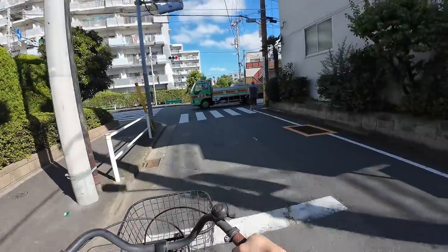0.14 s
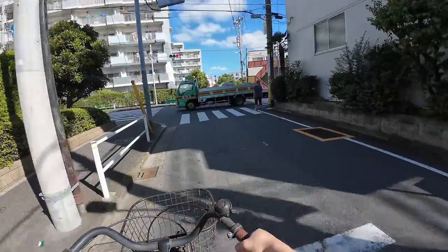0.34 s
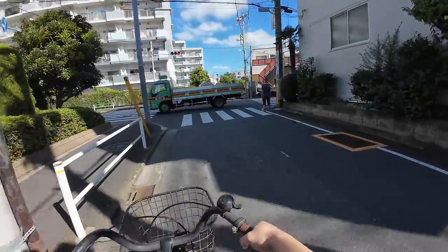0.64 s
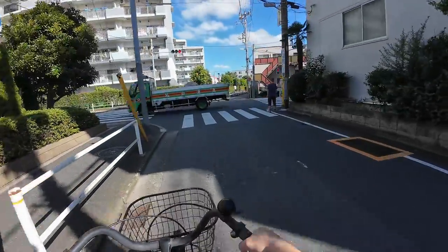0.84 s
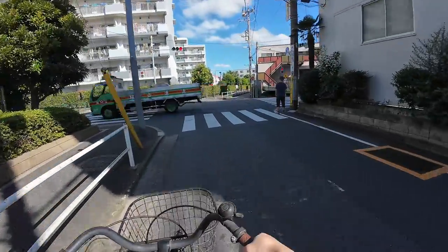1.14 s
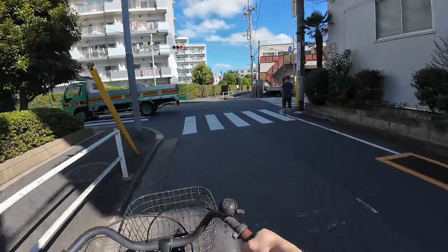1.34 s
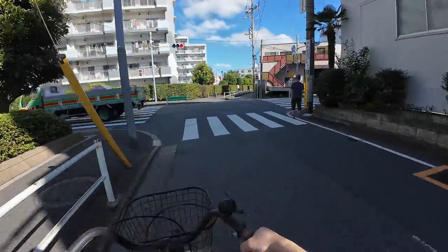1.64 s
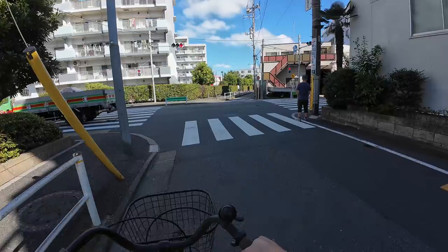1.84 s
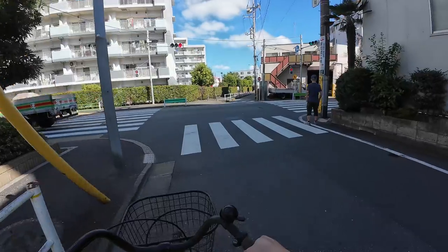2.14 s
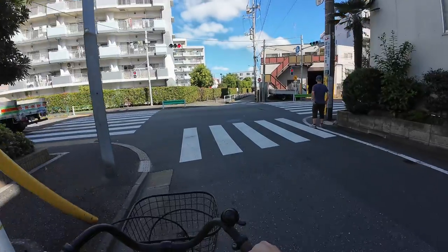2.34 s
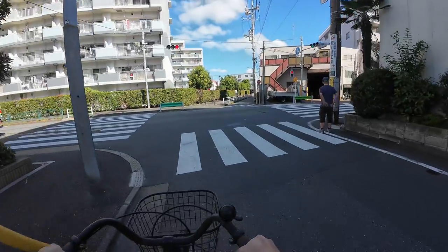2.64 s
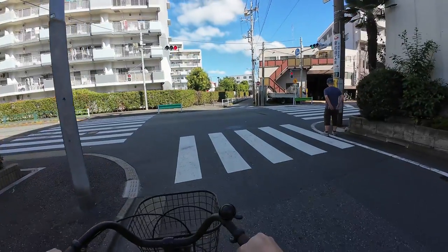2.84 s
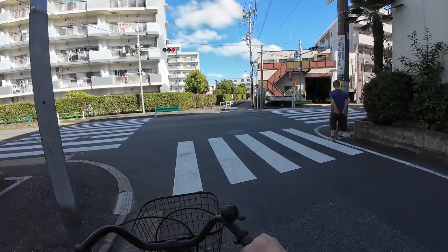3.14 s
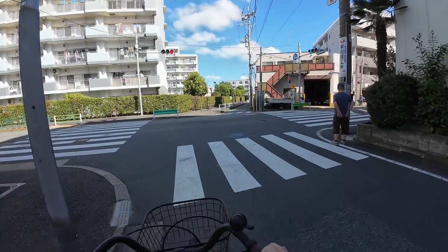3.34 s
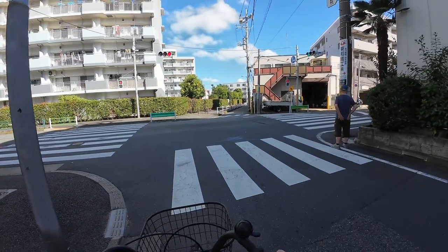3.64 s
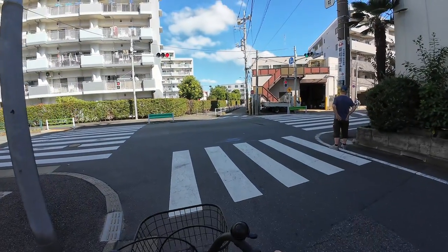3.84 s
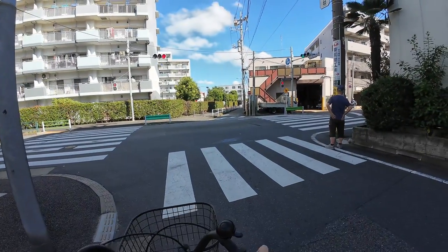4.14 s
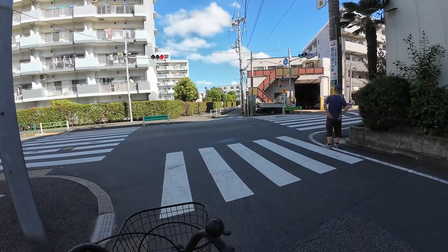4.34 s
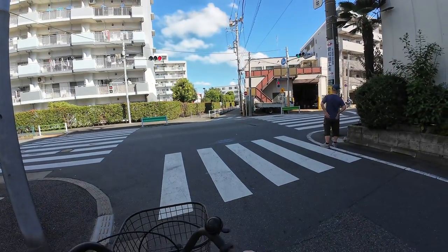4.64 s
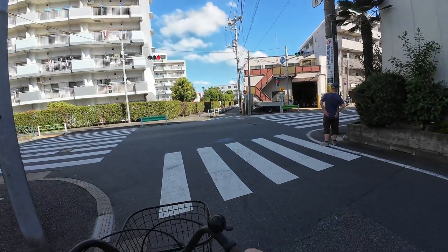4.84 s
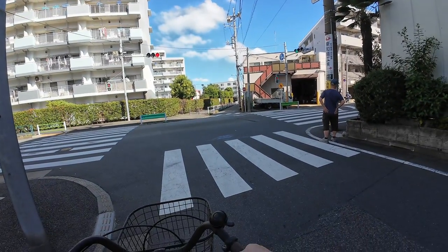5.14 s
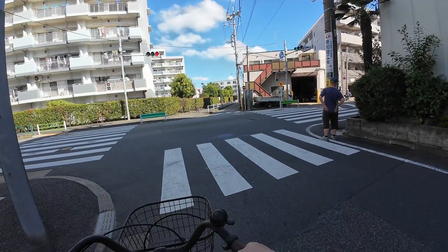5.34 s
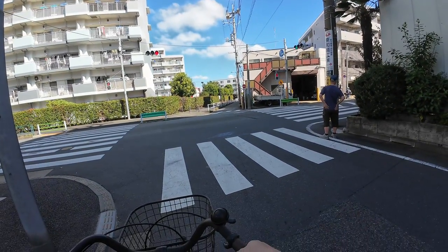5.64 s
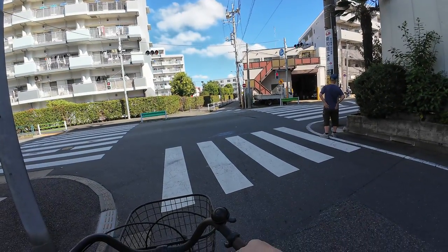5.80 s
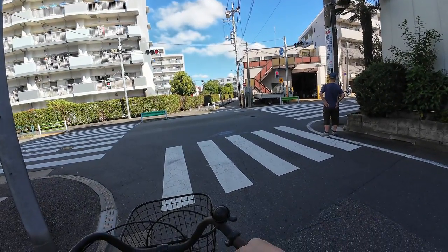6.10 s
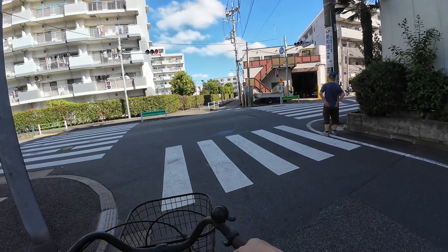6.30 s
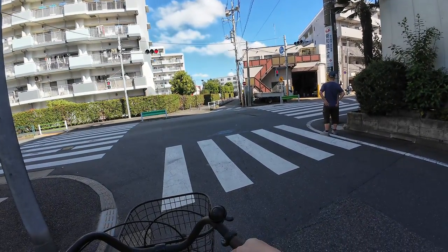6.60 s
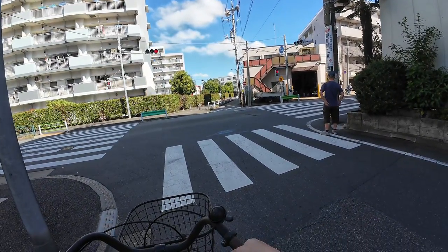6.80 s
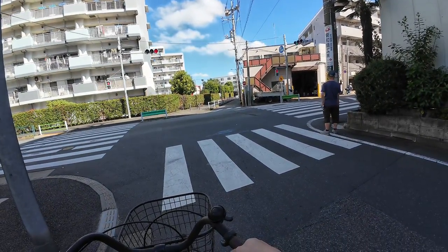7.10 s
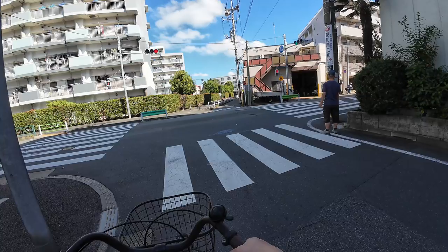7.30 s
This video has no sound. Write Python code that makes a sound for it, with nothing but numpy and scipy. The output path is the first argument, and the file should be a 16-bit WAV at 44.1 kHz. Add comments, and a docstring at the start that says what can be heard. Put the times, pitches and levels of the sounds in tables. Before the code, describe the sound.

Three sharp, very high brake squeals with a raspy chirping groan between them, over a departing truck's low rumble, then quieter street and another car nearing.

```python
"""A street corner between house walls: a bicycle slows to a stop, its brake the foremost sound at the microphone.
Wavering sines near 8 kHz make three strong squeals and a faint one; lower stacks of overtones make the groans.
A truck pulls away: its engine, a set of sines, speeds up until about 5 s; after that a low hum sinks in pitch.
Its roar of shaped noise fades and dulls. Another car comes near at the end. Sparse echoes return the brake
sounds from the walls; a thin treble fizz of band noise comes and goes."""
import sys
import numpy as np
from scipy import signal
from scipy.fft import rfft, irfft
from scipy.io import wavfile
from scipy.ndimage import uniform_filter1d

SR = 44100
rng = np.random.default_rng(int(sys.argv[2]) if len(sys.argv) > 2 else 0)


def transcribe(signal):
    """Save signal, clipped to [-1, 1], as a 16-bit WAV file at the path in sys.argv[1]."""
    frames = np.atleast_2d(signal).T
    limited = np.clip(frames, -1, 1)
    pcm = np.round(limited * 32767).astype(np.int16)
    wavfile.write(sys.argv[1], SR, pcm)


N = 328986

# the squealing brake, one list for each pull on the lever: start_s, pitch_hz, level_db
SQUEAL_PULLS = [
    [(1.064, 8060, -48), (1.073, 8000, -22), (1.08, 7950, -22), (1.085, 7940, -36), (1.096, 7930, -21),
     (1.101, 7930, -12), (1.107, 7940, -11), (1.113, 7960, -24), (1.119, 7960, -17), (1.127, 7950, -36),
     (1.134, 7930, -18), (1.142, 7930, -19), (1.148, 7960, -26), (1.153, 7980, -21), (1.165, 7860, -23),
     (1.168, 7790, -11), (1.21, 7760, -12.5), (1.226, 7640, -19), (1.232, 7630, -14), (1.262, 7640, -13.5),
     (1.272, 7660, -21), (1.286, 7640, -29), (1.294, 7720, -24), (1.308, 7720, -33), (1.318, 7720, -23),
     (1.328, 7730, -32), (1.336, 7740, -30), (1.36, 7780, -50)],
    [(1.912, 7955, -41), (1.922, 7840, -18), (1.942, 7790, -11), (1.964, 7830, -17), (1.976, 7822, -12),
     (2.06, 7815, -11), (2.134, 7774, -10), (2.15, 7710, -12), (2.162, 7650, -18), (2.19, 7640, -16),
     (2.198, 7650, -24), (2.21, 7690, -18), (2.224, 7756, -9.5), (2.26, 7775, -10), (2.268, 7715, -17),
     (2.298, 7703, -15), (2.324, 7714, -27), (2.334, 7724, -23), (2.365, 7770, -47)],
    [(2.44, 7940, -35), (2.446, 7640, -39), (2.46, 7560, -25.5), (2.49, 7670, -37.5)],
    [(3.025, 7980, -38), (3.031, 7930, -16), (3.052, 7873, -12), (3.07, 7870, -13), (3.08, 7876, -17),
     (3.098, 7885, -16.5), (3.116, 7900, -11.5), (3.144, 7907, -12.5), (3.16, 7940, -20),
     (3.171, 7945, -19), (3.181, 7950, -13.5), (3.201, 7995, -32), (3.215, 7970, -18), (3.224, 7980, -25),
     (3.231, 7990, -19.5), (3.243, 8020, -32), (3.255, 8030, -28), (3.262, 8050, -32), (3.276, 8000, -31),
     (3.304, 8000, -44), (3.325, 7850, -25), (3.36, 7780, -26), (3.378, 7761, -21.5), (3.428, 7752, -24),
     (3.448, 7690, -32), (3.462, 7615, -25), (3.54, 7580, -31), (3.58, 7585, -42), (3.66, 7570, -46),
     (3.775, 7640, -54), (3.8, 7640, -66)],
]
# octave level of each pull at the reference pitch, before twice the squeal's level is added: level_db
OCTAVE_LEVELS = [-21.5, -14.5, -17.5, -15.5]
REFERENCE_HZ, OCTAVE_DB_PER_HZ = 7770, 0.119  # the octave weakens as it nears the upper band limit
# every second slip differs and half-pitch lines sound:
# full_at_s, hold_s, level_db (re the squeal), rise_db_per_s, fall_db_per_s
HALF_PITCH = [(2.1, 0.3, -43, 200, 300), (2.16, .05, -36, 400, 400), (3.09, .09, -57, 604, 400)]
# two close modes beat and the squeal throbs evenly: deepest_dip_s, rate_hz, depth (0-1), reach_s
MODE_BEATS = [(1.193, 130, .35, .02), (1.24, 110, 0.1, .03), (2.055, 63, .35, 0.08),
              (2.176, 120, .55, 0.028), (2.278, 62, .3, .03), (3.39, 45, .25, 0.081), (3.5, 55, .25, .06)]


def squeal(rows, pull_db):
    """A brake mode locked in self-excited ringing: near a sine that trembles and throbs as the grip changes."""
    t, (hz, db) = columns(rows)
    db = uniform_filter1d(db, SR // 300, mode="nearest")  # the ringing cannot change at once
    octave_db = 2 * db + pull_db + OCTAVE_DB_PER_HZ * (REFERENCE_HZ - hz)
    turn = phase(hz * (1 + 0.0014 * wander(t, hz=70)))
    beat = np.zeros(len(t))
    for s, rate, depth, reach in MODE_BEATS:
        beat += depth * np.exp(-((t - s) / reach) ** 2) * np.cos(2 * np.pi * rate * (t - s))
    throb = (1 + 0.12 * wander(t, hz=70)) * (1 - beat)
    halves = np.sin(3 * turn / 2) + gain_of(6) * np.sin(turn / 2)
    halves *= 1 + .3 * wander(t, hz=30)
    lines = gain_of(db) * (np.sin(turn) + gain_of(swells(HALF_PITCH, t)) * halves)
    lines += gain_of(octave_db) * np.sin(2 * turn + .5 * wander(t, hz=200))
    return t[0], np.sqrt(2) * lines * throb * edges(t)


# groans of the pad slipping and gripping, one list each:
# start_s, pitch_hz, first_partial_db, second_partial_db, upper_db (reference for the upper partials and scrape)
PAD_GROANS = [
    [(2.522, 1775, -44, -50, -62), (2.531, 1750, -34, -25, -51), (2.539, 1720, -33, -21, -49),
     (2.545, 1685, -32, -28, -49), (2.551, 1680, -30, -20, -46), (2.56, 1685, -31, -24, -47),
     (2.567, 1688, -31, -22, -46), (2.58, 1680, -28, -35, -54), (2.586, 1715, -36, -27, -49),
     (2.592, 1695, -27, -20, -47), (2.6, 1650, -26, -20, -44), (2.604, 1625, -26, -26, -43),
     (2.609, 1600, -19, -20, -38), (2.613, 1615, -19, -19, -39), (2.617, 1690, -18, -14, -40),
     (2.622, 1625, -27, -24, -46), (2.634, 1598, -23, -30, -51), (2.648, 1610, -29, -35, -53),
     (2.658, 1600, -35, -34, -55), (2.668, 1620, -42, -46, -57), (2.695, 1670, -46, -50, -58),
     (2.716, 1720, -32, -39, -63), (2.73, 1680, -42, -47, -63), (2.745, 1640, -46, -56, -64)],
    [(3.408, 1520, -54, -50, -65), (3.414, 1500, -46, -38, -53), (3.424, 1520, -35, -36, -52),
     (3.433, 1550, -29, -47, -59), (3.441, 1540, -40, -54, -60), (3.45, 1525, -31, -54, -63),
     (3.485, 1510, -39, -60, -69), (3.502, 1515, -36, -62, -68), (3.56, 1490, -47, -66, -73)],
    [(3.81, 1705, -52, -70, -84), (3.86, 1711, -41, -65, -78), (3.915, 1716, -39, -63, -76),
     (3.95, 1720, -45, -67, -80)],
]
# upper partials of a groan: multiple (of the pitch), level_db (re upper_db)
UPPER_PARTIALS = [(3, 5.5), (4, 3), (5, 2), (6, 0.5), (7, -9), (8, -8.5), (9, -15)]
# relative spectrum of pad scraping, also that of the soft puffs and the rubbing: freq_hz, level_db
SCRAPE_SPECTRUM = [(1500, -21.5), (4000, 3.5), (6700, -3), (7500, 0), (8500, -15.5), (10000, -2),
                   (11500, -9), (13500, -5.5), (15800, -9)]


def groan(rows):
    """Stick-slip pulses: a rough stack of overtones, each trembling by itself, over bursts of scraping."""
    t, (hz, first_db, second_db, upper_db) = columns(rows)
    turn = phase(hz * (1 + .006 * wander(t, hz=250)))
    upper = np.zeros(len(t))
    for k, db in UPPER_PARTIALS:
        tremble = 1 + .45 * wander(t, hz=140)
        upper += gain_of(db) * tremble * np.sin(k * turn + .5 * wander(t, hz=350))
    scrape = evened(coloured(rng.standard_normal(len(t)), SCRAPE_SPECTRUM))
    upper += gain_of(-6 + 3 * wander(t, hz=60)) * scrape
    low = np.zeros(len(t))
    for k, db in (1, first_db), (2, second_db):
        tremble = 1 + .22 * wander(t, hz=150)
        low += gain_of(db) * tremble * np.sin(k * turn + .4 * wander(t, hz=300))
    return t[0], np.sqrt(2) * (low + gain_of(upper_db) * upper) * edges(t)


# brief fuzzy whistles beside the squeals and groans, some of them groan overtones or sum tones:
# start_s, length_s, pitch_hz, level_db, waver (share of the pitch)
SIDE_WHISTLES = [(2.159, .06, 4800, -51, .005), (2.17, .04, 5900, -57, .012), (2.17, .035, 7130, -49, .004),
                 (2.16, .06, 9450, -52, .015), (2.615, .035, 2100, -31, .02), (2.645, .045, 2150, -38, .02),
                 (2.6, .07, 13400, -49, .016), (2.67, .06, 13400, -57, .016), (2.62, .12, 6650, -55, .012),
                 (2.62, .07, 10000, -55, .012), (2.62, .03, 8400, -52, .01), (3.012, .018, 8200, -45, .005),
                 (3.043, .115, 7000, -51, .003), (2.16, .07, 13500, -58, .012),
                 (2.17, .05, 10200, -58, .03), (2.305, .085, 12500, -63, .004),
                 (3.085, .034, 8750, -58, .005), (3.035, .09, 15000, -60, .006),
                 (3.165, .04, 14300, -62, .015), (3.4, .05, 10550, -61, .012),
                 (3.45, .13, 10700, -67, .008), (3.49, .06, 12200, -67, .006), (3.5, .07, 13700, -66, .01),
                 (3.402, .016, 3450, -41, .025), (3.41, .19, 9200, -59, .008),
                 (3.768, .022, 4750, -48, .004), (3.767, .01, 6600, -50, .01), (3.825, .02, 6800, -58, .01),
                 (3.85, .05, 6000, -59, .015), (3.79, .06, 13300, -65, .015),
                 (3.895, .15, 13200, -62, .015), (6.087, .022, 7550, -70, .005)]


def whistle(s, length, hz, db, waver):
    """A brief whistle: a sine made fuzzy by fast random pitch and level."""
    t = np.arange(0, length, 1 / SR)
    turn = phase(hz * (1 + waver * wander(t, hz=200)))
    tremble = 1 + 0.31 * wander(t, hz=80)
    return s, np.sqrt(2) * gain_of(db) * tremble * np.sin(turn) * edges(t, .003, length / 3)


# soft puffs of bright noise around the brake sounds: start_s, level_db (before the soft start), t60_s
SOFT_PUFFS = [(1.835, -45, .35), (2.17, -43, .2), (2.41, -45, .2), (2.611, -38, .2), (2.809, -57, .044),
              (2.909, -56, 0.06), (3.245, -45, .2), (3.767, -34, 0.05), (3.899, -44, .08),
              (6.095, -61, .06)]


def soft_puffs():
    """Each puff is a short burst of bright noise with a soft start and an exponential decay."""
    out, t = np.zeros(N), np.arange(SR // 2) / SR
    bursts = coloured(rng.standard_normal((len(SOFT_PUFFS), len(t))), SCRAPE_SPECTRUM)
    for (s, db, t60), burst in zip(SOFT_PUFFS, bursts):
        decay = gain_of(db - 60 * t / max(t60, .01))
        add(out, s, decay * (1 - np.exp(-t / 0.003)) * evened(burst))
    return out


# dry rubbing of the pad: full_at_s, hold_s, level_db, rise_db_per_s, fall_db_per_s
PAD_RUB = [(2.625, 0.044, -42, 800, 198.3), (3.77, 0.0027, -44, 2020, 359.6),
           (3.892, 0.0053, -47, 91, 75.03)]


def rub():
    """Dry friction of the pad: scraping noise without a tone."""
    t = np.arange(N) / SR
    return gain_of(swells(PAD_RUB, t)) * evened(coloured(rng.standard_normal(N), SCRAPE_SPECTRUM))


# house walls: freq_hz, t60_s
WALL_DECAY = [(1000, 0.68), (4000, 0.28), (8000, 0.92), (15000, 1)]
# the echoes favour the higher notes of the squeal: freq_hz, level_db
ECHO_COLOUR = [(7550, -5.5), (8000, 8.5), (9000, 1)]


def walls(x):
    """Sparse echoes of random sign from the house walls, each band dying at its own speed."""
    taps = np.zeros(SR)
    at = np.arange(400, SR - 20, 20)
    taps[at + rng.integers(0, 20, len(at))] = rng.choice([-1., 1.], len(at))
    hz, t, z = signal.stft(taps, SR, nperseg=256)
    decay = gain_of(-60 * t / read(WALL_DECAY, hz)[:, None])
    tail = signal.istft(z * decay, SR, nperseg=256)[1]
    return signal.fftconvolve(coloured(x, ECHO_COLOUR), tail / np.linalg.norm(tail))[:N]


# truck engine, and after about 5 s a low hum that sinks in pitch: start_s, firing_hz (before smoothing),
# first_order_db, second_order_db, third_order_db, fifth_order_db, high_db (reference for the sixth order and up)
TRUCK_ENGINE = [(0.0, 38.85, -33, -39, -44, -37, -42), (0.32, 39.38, -30, -48, -34, -41, -33),
                (0.51, 40.55, -42, -35, -42.5, -34, -35.5), (0.91, 42.64, -25.5, -54, -35.5, -42, -39.5),
                (1.49, 44.05, -26, -46, -33, -28.5, -40), (1.68, 44.35, -26, -32, -33.5, -41, -39.5),
                (2.1, 45.23, -30, -45, -37.5, -46, -33.5), (2.16, 45.12, -32, -48, -39.5, -50, -50.5),
                (2.49, 45.7, -33, -36.5, -41, -36.5, -32.5), (2.79, 46.65, -33.5, -54, -33, -57, -37),
                (3.18, 47.59, -30, -42, -37, -46, -47.5), (3.26, 47.5, -28, -44, -51, -40, -35),
                (3.45, 47.7, -32, -42, -38, -52.5, -40), (4.61, 48.75, -43.5, -48, -48, -47, -38),
                (5.09, 48.84, -37.5, -51, -43, -47.5, -51), (5.21, 49.95, -35.5, -52, -46, -48.5, -40.5),
                (5.56, 46.24, -34, -46.5, -59, -56, -40), (5.74, 41.13, -45, -44.5, -46, -48.5, -45),
                (5.82, 40.77, -31, -47, -48, -44, -46.5), (6.05, 32.1, -35, -48, -59.5, -50.5, -49),
                (6.14, 30.8, -37, -48, -43.5, -55, -50), (6.3, 28.5, -54, -53, -50, -45, -59)]
# third and fourth orders: multiple (of the firing rate), level_db (re third_order_db)
MIDDLE_ORDERS = [(3, 0), (4, -6.5)]
# sixth order and up: multiple (of the firing rate), level_db (re high_db)
UPPER_ORDERS = [(6, -1), (7, -20), (8, -10.5)]


def truck_engine():
    """Cylinders firing in turn: sines at multiples of the firing rate, the upper ones slightly wavering."""
    out = np.zeros(N)
    t, (_, first_db, second_db, third_db, fifth_db, high_db) = columns(TRUCK_ENGINE)
    turn = firing()[:len(t)]
    orders = gain_of(first_db) * np.sin(turn)
    groups = [([(2, 0)], second_db), (MIDDLE_ORDERS, third_db), ([(5, 0)], fifth_db), (UPPER_ORDERS, high_db)]
    for table, level_db in groups:
        for k, db in table:
            tremble = 1 + .15 * wander(t, hz=5)
            orders += gain_of(level_db + db) * tremble * np.sin(k * turn + .25 * wander(t, hz=3))
    add(out, t[0], np.sqrt(2) * orders * edges(t, 0.00073, 0.077))
    return out


def firing():
    """Phase of the truck's firing cycle; the flywheel smooths the speed."""
    s, hz = np.transpose(TRUCK_ENGINE)[:2]
    rate = np.interp(np.arange(N) / SR, s, hz)
    return phase(uniform_filter1d(rate, SR // 3, mode="nearest"))


# hum of the car that comes near: start_s, pitch_hz, level_db
CAR_HUM = [(6.75, 56, -44), (6.92, 64.2, -46), (7.46, 65, -46.5)]
# faint whine of that car: start_s, pitch_hz, level_db
CAR_WHINE = [(6.95, 5700, -89), (7.2, 5670, -68.5), (7.46, 5660, -68)]


def coming_car():
    """The car's low hum and high whine: one sine each, roughened by fast pitch waver."""
    out = np.zeros(N)
    for rows, waver in (CAR_HUM, .01), (CAR_WHINE, .035):
        t, (hz, db) = columns(rows)
        turn = phase(hz * (1 + waver * wander(t, hz=201)))
        add(out, t[0], np.sqrt(2) * gain_of(db) * np.sin(turn) * edges(t, 0.039, 1e-3))
    return out


# drone of the truck body while it is close: full_at_s, hold_s, level_db, rise_db_per_s, fall_db_per_s
BODY_SWELL = [(.45, 0.6, -30, 6, 5)]
# resonances of the truck body: freq_hz, width_hz, level_db (relative)
BODY_RESONANCES = [(367.4, 127, 0.5), (1310, 260, -11.5), (2640, 290, -14.5), (3580, 200, -19.5)]
BODY_GONE_S = 3  # the truck turns behind the hedge


def truck_body(t, hz, patches):
    """The body droning in a few resonant bands of noise; the drone falls faster once behind the hedge."""
    bands = [db - 11.0 * ((hz - f) / width) ** 2 for f, width, db in BODY_RESONANCES]
    level_db = swells(BODY_SWELL, t) - 20.0 * np.maximum(t - BODY_GONE_S, 0)
    return noise(np.max(bands, axis=0) + patches, t, level_db)


# passing traffic: start_s, rumble_db, tyre_roar_db
TRAFFIC_LEVELS = [(0, -30, -33.5), (.95, -29.5, -31), (1.43, -27, -31.5), (2.199, -32, -35),
                  (2.78, -32.5, -35.5), (3.6, -33, -37), (4.3, -32.5, -39), (5.28, -34.5, -41.5),
                  (6, -38.5, -49), (6.71, -40, -52), (7.02, -35.5, -46), (7.46, -36, -42.5)]
# relative spectrum of the tyre roar: freq_hz, level_db (per Hz)
ROAR_SPECTRUM = [(240, -26.5), (400, -4), (773, -6.5), (1320, -1), (1640, -7), (2720, -10), (3030, -21),
                 (3640, -18.5), (5850, -28), (7140, -34.5), (8200, -34.5), (11300, -41.5), (13400, -32),
                 (15600, -47.5)]
# tilt per octave above 1 kHz, falling as the truck leaves
DULL_START_DB, DULL_DB_PER_S = 4, -1.0852


def tyre_roar(t, hz, patches):
    """Tyres on the road: broad noise that loses treble with distance."""
    dull_db = DULL_START_DB + DULL_DB_PER_S * t
    tilt = dull_db * np.log2(np.maximum(hz / 1000, 1))
    return noise(read(ROAR_SPECTRUM, hz) + tilt + 0.84 * patches, t, traffic_levels(t)[1])


# relative spectrum of the far tyre hiss: freq_hz, level_db (per Hz)
STREET_SPECTRUM = [(1800, -24), (2800, 1), (3300, 1.5), (3900, -4), (4600, -15.5), (5800, -15),
                   (7100, -26.5), (9700, -24), (11900, -26), (13400, -25), (15700, -28)]
STREET_DB, STREET_FOLLOW = -18.5, 0.86  # far tyre hiss follows the roar by this share of its dB
ROLL_DB, ROLL_S = 5.5, 1.3  # extra hiss while the bicycle rolls fast, and the time in which it dies away


def street_hiss(t, hz, patches):
    """Far tyres and the rolling bicycle: hiss tied to the roar, with extra level at the start."""
    rolling_db = ROLL_DB * np.exp(-(t / ROLL_S) ** 2)
    level_db = STREET_DB + STREET_FOLLOW * traffic_levels(t)[1] + rolling_db
    return noise(read(STREET_SPECTRUM, hz) + patches, t, level_db)


# relative spectrum of the rumble, before its tilt: freq_hz, level_db (per Hz)
RUMBLE_SPECTRUM = [(12, -26.5), (20, 12), (54, -5), (156, -1), (201, 0), (300, -1), (357, -8.5),
                   (567, -8.5), (900, -17), (1170, -61.5), (1980, -120)]
# rumble brightness: start_s, tilt_db (per octave)
RUMBLE_TILT = [(0, 0.6), (1.4, .5), (2.8, 1), (5.3, 1), (6.8, -1), (7.46, -1.5)]


def rumble(t, hz, patches):
    """Low traffic noise whose spectrum tilts slowly about 200 Hz."""
    tilt = np.interp(t, *np.transpose(RUMBLE_TILT)) * np.log2(np.maximum(hz, 30) / 200)
    return noise(read(RUMBLE_SPECTRUM, hz) + tilt + 0.75 * patches, t, traffic_levels(t)[0])


# high fizz that comes and goes: full_at_s, hold_s, level_db, rise_db_per_s, fall_db_per_s
FIZZ_SWELLS = [(4.12, .36, -66.5, 62, 150), (4.87, .35, -62, 259, 43), (6.15, .33, -65, 250.5, 120),
               (6.55, .23, -70, 201, 350.5), (7.32, .06, -68, 349.5, 100), (7.46, .02, -57.5, 109, 101)]
# one short hiss near 9.5 kHz: full_at_s, hold_s, level_db, rise_db_per_s, fall_db_per_s
SHORT_HISS = [(4.234, 0.011, -55.5, 220.3, 170.5)]


def fizz(t, hz, patches):
    """Thin treble noise in two narrow bands: fizz near 13.8 kHz and one short hiss near 9.5 kHz."""
    high = noise(-6.5 * ((hz - 13800) / 1100) ** 2 + 1.5 * patches, t, swells(FIZZ_SWELLS, t))
    low = noise(-6.5 * ((hz - 9500) / 700) ** 2 + 1.64 * patches, t, swells(SHORT_HISS, t))
    return high + low


CLATTER = .12  # mean depth by which each firing pulses the body drone, roar and hiss


def traffic():
    """All road noise in shared drifting patches; the truck's firing pulses its body, the roar and the hiss."""
    t, hz = np.arange(N // 256 + 5) * 256 / SR, np.fft.rfftfreq(1024, 1 / SR)[:, None]
    grain = rng.standard_normal((len(t), len(hz))).T
    patches = evened(uniform_filter1d(uniform_filter1d(grain, 10, 0), 14, 1))
    field = t, hz, patches
    pulsing = np.arange(N) < TRUCK_ENGINE[-1][0] * SR
    pulse = 1 + CLATTER * (1 + 0.33 * wander(pulsing, hz=9.8)) * np.cos(firing()) * pulsing
    pulsed = (truck_body(*field) + tyre_roar(*field) + street_hiss(*field)) * evened(pulse)
    return rumble(*field) + pulsed + fizz(*field)


def traffic_levels(t):
    """Rumble and tyre roar levels in dB at the times t."""
    s, *curves = np.transpose(TRAFFIC_LEVELS)
    return [np.interp(t, s, c) for c in curves]


def gain_of(db):
    """Decibels to a factor."""
    return 10 ** (np.asarray(db) / 20)


def evened(x):
    """Scales to rms 1."""
    return x / np.sqrt(np.mean(x ** 2) + 1e-20)


def phase(hz):
    """Running phase in radians of a pitch given at every sample."""
    return 2 * np.pi * np.cumsum(hz) / SR


def read(points, hz):
    """Reads a spectrum table on a log-frequency axis."""
    f, value = np.transpose(points)
    return np.interp(np.log(hz + 1), np.log(f + 1), value)


def coloured(x, points):
    """Filters x by a spectrum table."""
    size = x.shape[-1]
    return irfft(rfft(x) * gain_of(read(points, np.fft.rfftfreq(size, 1 / SR))), size)


def columns(rows):
    """Time axis over a table's span and its columns at every sample."""
    s, *rest = np.transpose(rows)
    t = np.arange(s[0], s[-1], 1 / SR)
    return t, [np.interp(t, s, c) for c in rest]


def swells(rows, t):
    """Level in dB of the loudest swell at each time: rise, hold, fall."""
    return np.max([db - rise * np.maximum(s - t, 0) - fall * np.maximum(t - s - hold, 0)
                   for s, hold, db, rise, fall in rows], axis=0)


def wander(t, hz):
    """Smooth random motion of rms 1, up to about hz turns a second."""
    size = max(int(SR / hz / 2), 2)
    return evened(uniform_filter1d(uniform_filter1d(rng.standard_normal(len(t)), size), size))


def noise(field_db, t, level_db):
    """Noise with short-time spectra shaped by field_db (bins x frames), evened, then set to level_db over time."""
    shape = gain_of(field_db) * np.ones(len(t))
    a, b = rng.standard_normal((len(t), len(shape), 2)).T
    z = (a + 1j * b) * shape / np.sqrt((shape ** 2).mean(0))
    x = evened(signal.istft(z, nperseg=1024, noverlap=768)[1][:N])
    return x * gain_of(np.interp(np.arange(N) / SR, t, level_db))


def edges(t, rise=0.0027, fall=0.002):
    """Short smooth fades, in seconds, at both ends of a sound."""
    ramp = np.minimum((t - t[0]) / rise, (t[-1] - t) / fall)
    return np.sin(np.pi / 2 * np.clip(ramp, 0, 1)) ** 2


def add(mix, s, sound):
    """Mixes a sound in at second s."""
    part = mix[max(round(s * SR), 0):][:len(sound)]
    part += sound[:len(part)]


def scene():
    """The brake in front, its echoes from the walls, then truck, car and road noise."""
    brake = soft_puffs() + rub()
    for rows, pull_db in zip(SQUEAL_PULLS, OCTAVE_LEVELS):
        add(brake, *squeal(rows, pull_db))
    for rows in PAD_GROANS:
        add(brake, *groan(rows))
    for row in SIDE_WHISTLES:
        add(brake, *whistle(*row))
    echoes = gain_of(-19.0) * walls(brake)
    return (brake + echoes + truck_engine() + coming_car() + traffic())[None]


EDGE_HZ = 15768  # upper band limit


def record(dry):
    """The recorder behind the microphone: a steep low-pass at its band limit."""
    taps = signal.firwin(4095, EDGE_HZ, window=("kaiser", 12), fs=SR)
    return signal.oaconvolve(dry, taps[None], "same")


dry = scene()
out = record(dry)
transcribe(out)
```